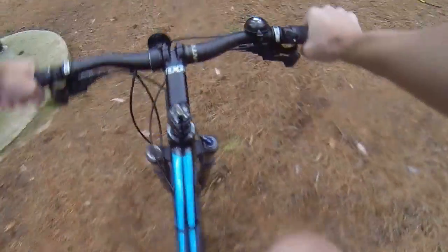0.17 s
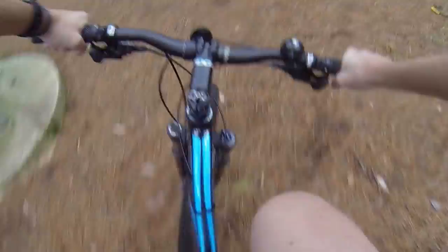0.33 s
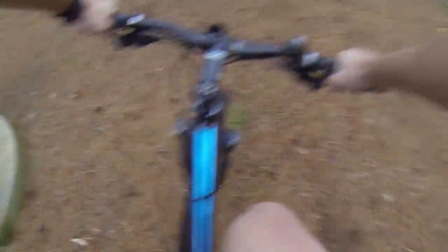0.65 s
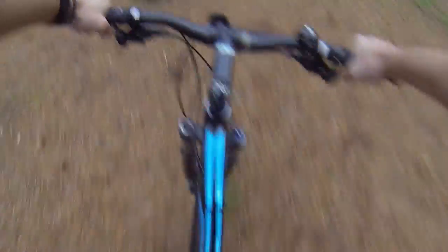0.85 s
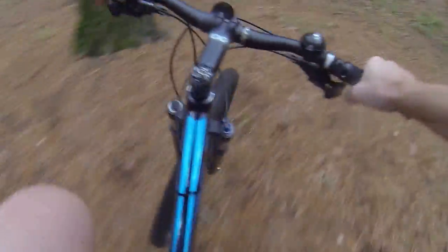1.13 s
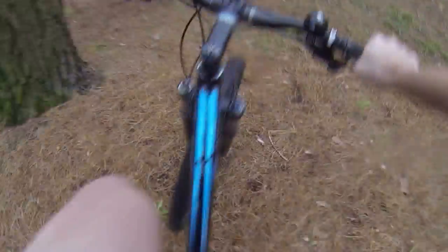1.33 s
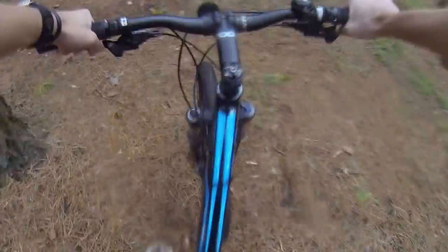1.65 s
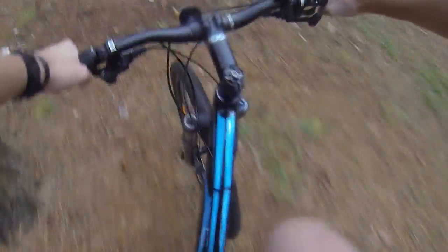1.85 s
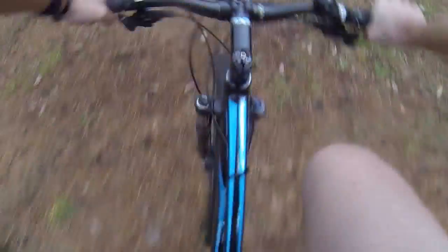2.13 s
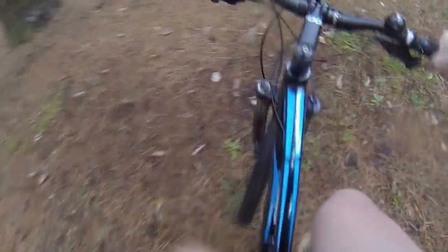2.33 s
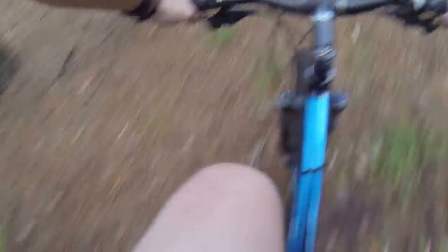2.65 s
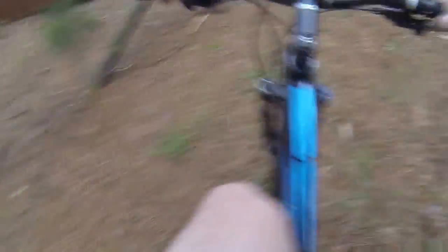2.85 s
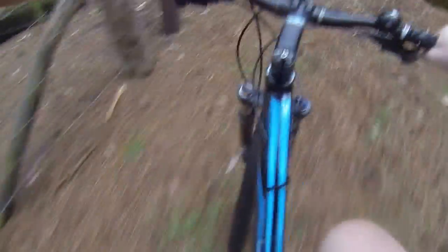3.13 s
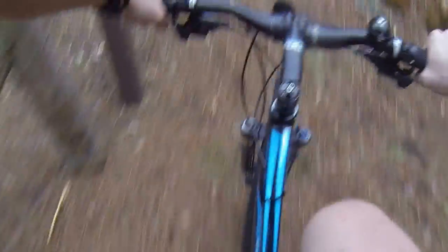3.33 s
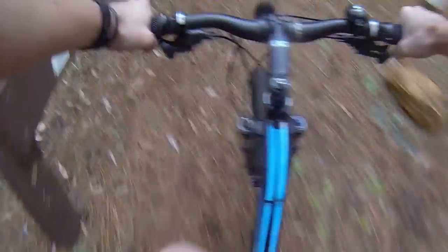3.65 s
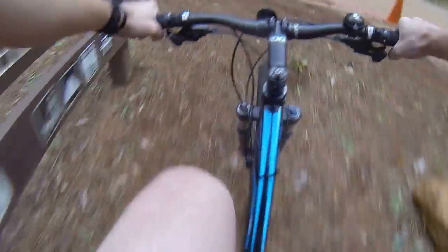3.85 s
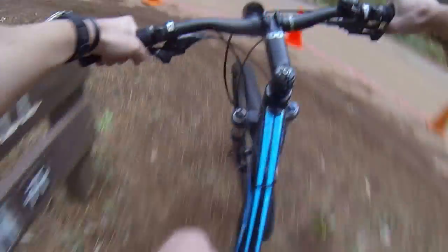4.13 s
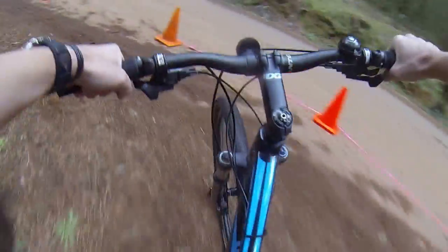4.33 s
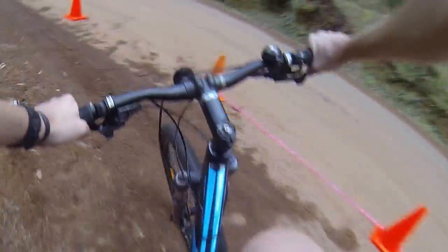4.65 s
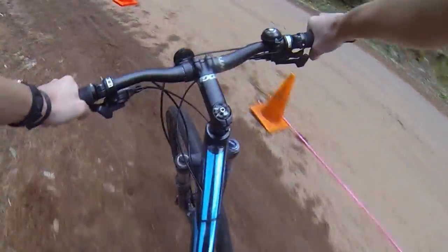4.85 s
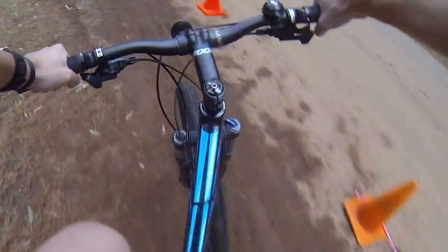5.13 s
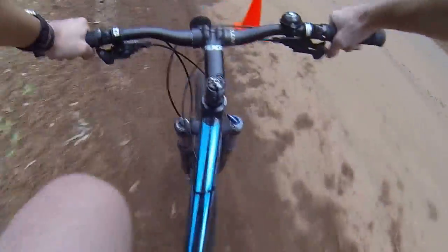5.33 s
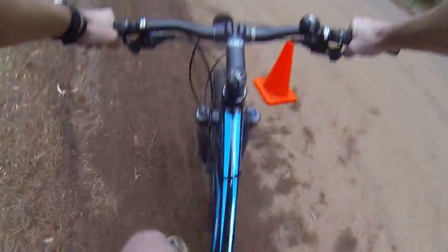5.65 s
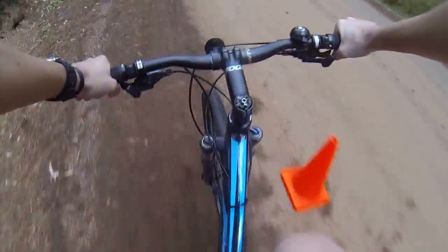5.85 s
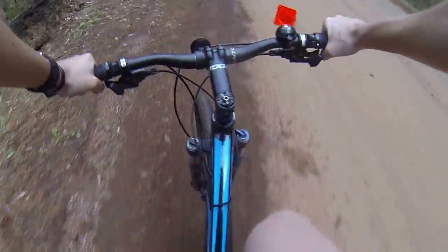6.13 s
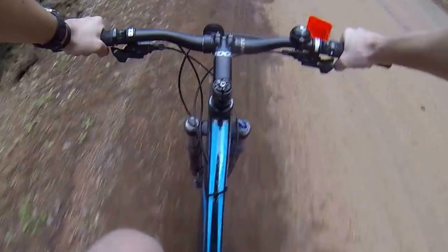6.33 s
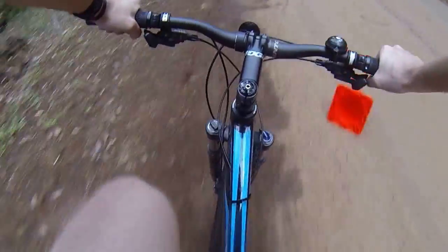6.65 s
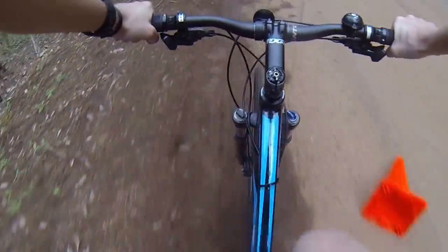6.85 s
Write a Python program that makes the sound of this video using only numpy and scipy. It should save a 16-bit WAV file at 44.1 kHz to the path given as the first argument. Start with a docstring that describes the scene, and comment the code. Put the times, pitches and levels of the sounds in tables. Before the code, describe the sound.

A mountain bike rolls along a dirt trail, its knobbly tyres drumming low and crunching through loose soil in uneven spurts. Bumps bring deep thumps and sharp rattles of chain and cables, hardest a little before halfway. Dry parts squeak briefly, the brake hisses softly once, then a faint sandy fizz joins the rolling. Light wind and a few dull jolts rock the chest-worn microphone in the open air.

```python
"""Mountain bike on a dirt trail

Heard from a camera on the rider's chest, knobbly tyres drum and crunch over soil, then fizz on sand.
Bumps set the tyres booming; chain and cables rattle, dry parts squeak and the brake rubs once.
Light wind rocks the microphone, the camera's electronics whine faintly, and jolts swing it a few times."""
import sys
import numpy as np
from scipy.fft import rfft, irfft, next_fast_len
from scipy.io import wavfile
from scipy.ndimage import map_coordinates

SR = 44100
rng = np.random.default_rng(int(sys.argv[2]) if len(sys.argv) > 2 else 0)


def dump_mix(stems):
    """Bounce the given channels to the path in sys.argv[1] as a 16-bit WAV at rate SR."""
    frames = np.atleast_2d(stems).T  # one column per channel
    limited = np.clip(frames, -1, 1)  # hard clip at full scale
    pcm = np.round(limited * 32767).astype(np.int16)
    wavfile.write(sys.argv[1], SR, pcm)


N = 307818


def amp(db):
    """Amplitude ratio of a level in decibels."""
    return 10 ** (np.asarray(db) / 20)


def unit(x):
    """Normalisation to an rms of 1."""
    return x / np.sqrt(np.mean(x ** 2) + 1e-20)


def curve(rows):
    """Linear interpolation of (time_s, value) rows at every sample."""
    return np.interp(np.arange(N) / SR, *np.transpose(rows))


def ramp(start_s, length_s):
    """Linear rise from 0 to 1."""
    return np.clip((np.arange(N) / SR - start_s) / length_s, 0, 1)


def wobble(rate_hz):
    """Smooth random modulation: a spline through rate_hz Gaussian values a second."""
    knots = rng.standard_normal(int(N * rate_hz / SR) + 4)
    return map_coordinates(knots, [np.arange(N) * rate_hz / SR])


def filtered(x, response):
    """Linear filtering: the spectrum is multiplied by a frequency response."""
    size = next_fast_len(len(x) + 8192)
    return irfft(rfft(x, size) * response(np.fft.rfftfreq(size, 1 / SR)), size)[:len(x)]


def coloured(x, points):
    """Spectral shaping by (frequency_hz, gain_db) points on a logarithmic frequency axis."""
    points_hz, gain_db = np.transpose(points)
    return filtered(x, lambda hz: amp(np.interp(np.log(hz + 1), np.log(points_hz + 1), gain_db)))


def resonate(x, modes):
    """Modal superposition: damped resonances (centre_hz, width_hz, gain_db) add with alternating sign."""
    def response(hz):
        return sum((-1) ** k * amp(db) * 1j * hz * width / (centre ** 2 - hz ** 2 + 1j * hz * width)
                   for k, (centre, width, db) in enumerate(modes))
    return filtered(x, response)


def noise(spectrum):
    """Gaussian noise of the given spectral shape, with an rms of 1."""
    return unit(coloured(rng.standard_normal(N), spectrum))


def grains(rate_hz, spread_db):
    """Shot noise: tiny independent impacts of uneven size."""
    impulses = (rng.random(N) < rate_hz / SR) * rng.choice([-1, 1], N)
    return unit(impulses * amp(spread_db * np.clip(rng.standard_normal(N), -2, 2)))


def add(track, start_s, sound):
    """Superposition of a sound on the track."""
    start = round(start_s * SR)
    track[start:start + len(sound)] += sound[:N - start]


def tyres():
    """Impact excitation: knobs drum on the casing, crush soil and keep wheel and frame ringing."""
    # drumming as the tyres are pressed on the ground: time_s, level_db
    load = [(0.0, -51), (0.21, -46), (0.41, -41), (1.56, -48), (1.77, -55.5), (2.02, -43), (2.17, -44),
            (2.64, -41), (2.8, -35.5), (3.36, -49), (4.2, -53.5), (4.7, -40), (5.01, -46.5), (5.44, -48),
            (5.68, -46.5), (6.26, -48), (6.71, -41), (6.98, -49.5)]
    # steady rolling noise: time_s, level_db
    rolling = [(0.0, -56.5), (0.19, -59), (0.56, -54.5), (0.83, -53.5), (0.95, -57), (1.57, -56.5),
               (2.06, -53.5), (2.53, -57.5), (2.88, -50.5), (3.07, -57), (3.46, -59.5), (3.77, -60.5),
               (4.12, -60.5), (4.43, -58), (5.4, -60.5), (5.93, -58), (6.04, -58.5), (6.98, -60)]
    # response of the tyre casing: frequency_hz, gain_db
    casing = [(30, -2), (65, -10), (100, -3), (135, 2.5), (175, -6.5), (230, -14.5), (300, -23.5),
              (380, -33), (470, -31.5), (650, -31.5), (2000, -107)]
    # spectrum of crushed soil: frequency_hz, gain_db
    soil = [(200, 5.5), (400, -5.5), (720, -7), (1000, -1.5), (1350, 3.5), (1750, -2), (2150, 3.5),
            (2600, -7), (3100, -2.5), (3900, -13.5), (5300, -16), (6200, -37.5), (9000, -37), (15000, -56)]
    # modes of wheel and frame: centre_hz, width_hz, gain_db
    frame_modes = [(462, 104, -9.5), (815, 230, -11), (1270, 258, 1), (1455, 165, 4.5), (2200, 820, -9.5),
                   (2770, 600, -10), (5000, 720, -31)]
    load_db, roll_db = curve(load), curve(rolling)
    scuff = scuffs(lag_s=0)
    casing_scuff = scuffs(lag_s=0.016)  # the casing answers a little later
    clods_db = 2.97 * wobble(55)  # uneven soil loads the tread in quick spurts
    ground_db = 0.69 * wobble(14)  # the track undulates
    # rolling and scuffing add in power
    drum_gain = np.hypot(amp(load_db + 2 + ground_db), amp(10) * casing_scuff) * amp(0.84 * clods_db)
    drum = drum_gain * unit(coloured(grains(rate_hz=500, spread_db=3.5), casing))
    grit = grains(rate_hz=2600, spread_db=1.5)
    stones = amp(-6.5) * grains(rate_hz=200, spread_db=2)
    crunch_gain = np.hypot(amp(roll_db - 1 + ground_db), amp(0.5) * scuff) * amp(clods_db)
    crunch = crunch_gain * unit(coloured(grit + stones, soil))
    ring_gain = np.hypot(amp(roll_db + 1.5 + 1.8 * wobble(14)), amp(-4) * scuff)
    ring = ring_gain * unit(resonate(grains(rate_hz=5000, spread_db=1.5), frame_modes))
    return contact() * (drum + crunch + ring)


def scuffs(lag_s):
    """Amplitude envelope that swells and fades as a tyre crosses each patch of loose soil."""
    # loose patches: middle_s, level_db, length_s
    patches = [(0.175, -48, 0.044), (0.298, -47.5, 0.033), (0.381, -44.5, 0.074), (0.504, -48, 0.073),
               (0.584, -53, 0.022), (0.884, -56, 0.044), (0.945, -52, 0.053), (1.278, -48.5, 0.096),
               (1.655, -53, 0.019), (1.761, -55.5, 0.065), (1.994, -48, 0.049), (2.192, -48, 0.076),
               (2.324, -46, 0.036), (2.469, -52, 0.053), (2.671, -49, 0.12), (2.902, -50.5, 0.05),
               (3.086, -49, 0.041), (3.296, -54, 0.032), (3.4, -51.5, 0.031), (3.724, -53, 0.067),
               (3.874, -51.5, 0.067), (4.268, -52, 0.051), (4.795, -51, 0.054), (5.004, -50, 0.022),
               (5.135, -50.5, 0.052), (5.227, -51.5, 0.056), (5.334, -52, 0.11), (5.498, -52, 0.053),
               (5.591, -51, 0.052), (5.678, -53.5, .04), (5.968, -48, .04), (6.148, -50.5, 0.045),
               (6.37, -70, 0.055), (6.62, -55.5, 0.042), (6.738, -52, 0.088), (6.854, -48, 0.04)]
    t = np.arange(N) / SR - lag_s
    return sum(amp(db) * np.exp(-np.abs((t - middle_s) / (0.64 * length_s)) ** 3)
               for middle_s, db, length_s in patches)


def contact():
    """Amplitude modulation by contact force: tyre noise dips when the tyres run light."""
    # lulls: middle_s, depth_db
    lulls = [(.24, -0.5), (1.06, 3), (1.47, 6.5), (1.82, 3.5), (3.23, 3.5), (3.56, 2.5), (4.13, 0),
             (5.75, 1.5)]
    t, half_length_s = np.arange(N) / SR, 0.028
    return amp(-sum(db * np.exp(-((t - middle_s) / half_length_s) ** 2) for middle_s, db in lulls))


def air():
    """Pressure fluctuations of the wind rock the microphone, over its own even hiss."""
    # strength of the buffeting: time_s, level_db
    wind = [(0.0, -40), (1.05, -46.5), (1.4, -37.5), (3.17, -45.5), (3.52, -36), (4.26, -42), (5.15, -41.5),
            (5.58, -36), (5.89, -44), (6.98, -40)]
    # spectrum of wind on the microphone: frequency_hz, gain_db
    buffet = [(4, -46.5), (10, 4), (18, 6), (30, -9), (50, -13.5), (80, -26), (160, -50), (400, -85)]
    # spectrum of the microphone's self-noise: frequency_hz, gain_db
    hiss = [(3000, 4), (6300, -4.5), (7800, -4.5), (9000, -9), (14000, -9.5), (15200, -31)]
    wind_db = curve(wind) + 4.5 + 0.31 * wobble(3.1)
    return amp(wind_db) * noise(buffet) + amp(-68) * noise(hiss)


def electronics():
    """Close pure tones beat in the camera's whine; a gated tone buzzes once for each picture it takes."""
    # partials of the whine: pitch_hz, rms_db
    partials = [(10700, -96), (10750, -77), (10800, -85), (10850, -92), (10900, -94), (10950, -96),
                (11000, -99)]
    picture_hz, buzz_hz = 50, 8410
    t = np.arange(N) / SR
    whine = sum(amp(db) * np.sqrt(2) * np.sin(2 * np.pi * (hz * t + rng.random())) for hz, db in partials)
    picture, fraction = np.divmod(t * picture_hz, 1)
    phase = rng.random(int(picture[-1]) + 1)[picture.astype(int)]
    gate = np.exp(-np.abs((fraction - 0.78) / 0.16) ** 4)
    buzz = unit(gate * np.sin(2 * np.pi * (buzz_hz * t + phase)))
    return whine + amp(-81.5) * buzz


def bumps():
    """Damped free vibration: each bump squashes a tyre, which booms, and shoves the whole bike."""
    # roots and stones hit the tyres: start_s, level_db
    hits = [(0.374, -41), (.408, -19.5), (0.579, -27), (0.785, -17), (.857, -14), (1.65, -17),
            (2.709, -18.5), (2.760, -11), (2.831, -9), (3.014, -26.5), (4.593, -25.5), (5.108, -29.5),
            (5.584, -24), (5.958, -25), (6.73, -26.5)]
    tyre_hz, tyre_t60_s = 132.6, 0.12
    shove_hz, shove_t60_s = 62, 0.076
    out, t = np.zeros(N), np.arange(SR // 4) / SR
    squash = 1 - np.exp(-(t / 0.004) ** 2)  # soft rubber takes up the blow gradually
    boom = np.sin(2 * np.pi * tyre_hz * t) * amp(-60 * t / tyre_t60_s)
    shove = np.sin(2 * np.pi * shove_hz * t) * amp(-2.5 - 60 * t / shove_t60_s)
    for start_s, db in hits:
        add(out, start_s, -amp(db) * squash * (boom + shove))
    return out


def rattles():
    """Transient excitation: a hard contact rings one resonance, and loose parts buzz on after it."""
    # chain and cables slap the frame: start_s, relative_db, centre_hz
    slaps = [(.391, -33, 1270), (.724, -29.5, 1810), (.782, -32, 1680), (.804, -28, 1380),
             (.860, -35, 1300), (.975, -42, 2000), (.986, -27.5, 2030), (1.649, -40, 940),
             (2.706, -39, 1300), (2.758, -28, 1300), (2.805, -28, 2300), (2.810, -35, 2080),
             (2.823, -35, 2200), (2.829, -21.5, 1390), (4.588, -33.5, 1700), (4.590, -29.5, 980),
             (4.858, -32.5, 2000), (4.874, -30, 1100), (4.885, -30, 1900), (4.915, -28.5, 1900),
             (5.584, -39, 1350), (5.601, -36, 1120), (5.958, -24.5, 2350), (5.976, -44, 1900),
             (6.136, -39, 1980), (6.416, -38, 2140), (6.686, -37.5, 1700), (6.827, -32.5, 1370),
             (6.848, -33.5, 1700), (6.864, -27, 1650)]
    # colour of a slap on its way to the microphone: frequency_hz, gain_db
    path = [(300, -14), (700, 5.5), (1200, 6.5), (3100, 2.5), (4000, -14.5), (5400, -3.5), (6300, -21),
            (15000, -34)]
    click_t60_s, buzz_t60_s = 0.014, 0.062
    out, t = np.zeros(N), np.arange(-SR // 100, SR // 8) / SR
    age = np.maximum(t, 0)
    force = (t >= 0) * (amp(-60 * age / click_t60_s) + amp(-9 - 60 * age / buzz_t60_s))
    for start_s, db, centre_hz in slaps:
        strike = rng.standard_normal(len(t)) * force
        width_hz = centre_hz ** 2 / 2200  # low knocks ring longer than high clicks
        ring = resonate(strike, [(centre_hz, width_hz, 0)])
        add(out, start_s + t[0], amp(db - 24.5) * unit(coloured(ring, path)))
    return out


def squeaks():
    """Dry friction excites a resonance: a narrow one chirps, a wide one rasps."""
    # dry parts rub: middle_s, level_db, pitch_hz, width_hz, half_length_s
    rubs = [(0.468, -68, 7300, 300, .011), (2.539, -54, 2930, 700, 0.021), (2.613, -51, 2730, 350, 0.012),
            (3.719, -52.5, 2180, 500, 0.036), (3.783, -50, 2070, 260, 0.017), (3.794, -51, 1270, 220, 0.02),
            (3.789, -63, 6000, 6000, .012), (6.363, -52, 2780, 330, 0.015)]
    out, t = np.zeros(N), np.arange(-SR // 10, SR // 10) / SR
    for middle_s, db, pitch_hz, width_hz, half_length_s in rubs:
        mode = [(pitch_hz, width_hz, 0)]
        rub = resonate(resonate(rng.standard_normal(len(t)), mode), mode)  # twice, for steeper skirts
        add(out, middle_s + t[0], amp(db) * unit(rub) * np.exp(-(t / half_length_s) ** 4))
    return out


def jolts():
    """A low-frequency pressure pulse arises as the camera swings once, with a dull thud of its mount."""
    # the camera is jolted on its harness: peak_s, level_db, sway_hz
    swings = [(1.325, -7, 20.3), (1.461, -18.5, 18.6), (1.671, -2, 24), (3.424, -10.5, 19),
              (3.944, -23.5, 17), (5.616, -6, 25.7)]
    # spectrum of the mount: frequency_hz, gain_db
    mount = [(30, 1), (65, 5), (130, -1.5), (210, -9), (330, -28), (700, -29), (1500, -41), (4000, -120)]
    out, t = np.zeros(N), np.arange(N) / SR
    thud = amp(-21.5) * noise(mount)
    for peak_s, db, sway_hz in swings:
        cycles = (t - peak_s) * sway_hz
        width = np.where(cycles < 0, 0.42, 0.62)  # it builds faster than it settles
        swing = np.cos(2 * np.pi * cycles) * np.exp(-(cycles / width) ** 2)
        knock = np.exp(-((cycles + 0.33) / 0.52) ** 2)  # the mount strikes as the swing begins
        out += amp(db) * (swing + thud * knock)
    return out


def brake():
    """Sliding friction: the pads grab, hiss softly on the disc and let go."""
    # spectrum of the pads on the disc: frequency_hz, gain_db
    pads = [(700, -47), (1400, -69), (1800, -9), (2200, 17), (3300, 12), (4000, 1.5), (5300, 12),
            (6300, -18), (12000, -23)]
    grip = ramp(start_s=3.9, length_s=0.052) - ramp(start_s=4.33, length_s=0.18)
    return grip * amp(-63.5 + 0.59 * wobble(26)) * noise(pads)


def sand():
    """Dense shot noise: fine grains fizz off the tread once the tyres reach packed sand."""
    # spectrum of thrown sand: frequency_hz, gain_db
    spray = [(1500, -1), (3000, 13.5), (4200, 2), (5800, 5.5), (6600, -3), (7800, 3), (9500, -7.5),
             (15000, -15)]
    fizz = unit(coloured(grains(rate_hz=9000, spread_db=6.5), spray))
    return ramp(start_s=5.68, length_s=0.047) * amp(-64 + 1.7 * wobble(12)) * fizz


def scene():
    """Free-field superposition: all sources add at one microphone in the open air."""
    bike = tyres() + sand() + bumps() + rattles() + squeaks() + brake()
    return (bike + jolts() + air() + electronics())[None]


def record(dry):
    """Band limiting: the camera passes nothing above its cutoff."""
    cutoff_hz = 15100
    return filtered(dry[0], lambda hz: hz < cutoff_hz)[None]


dry = scene()
out = record(dry)
dump_mix(out)
```